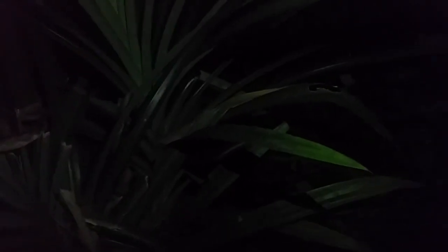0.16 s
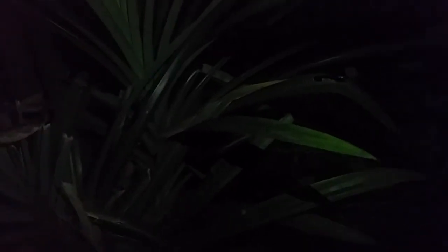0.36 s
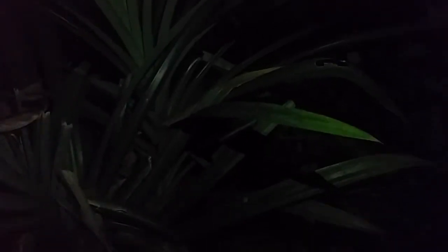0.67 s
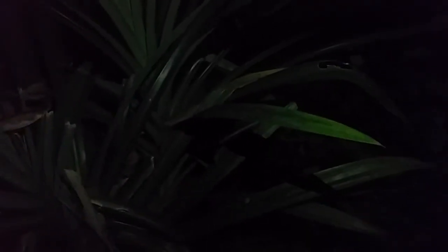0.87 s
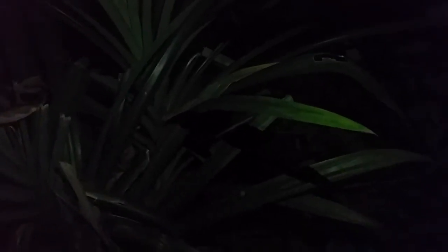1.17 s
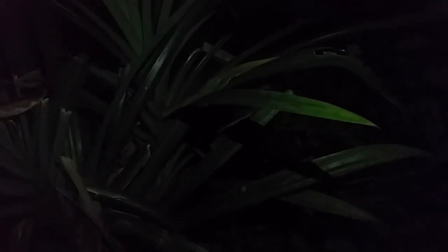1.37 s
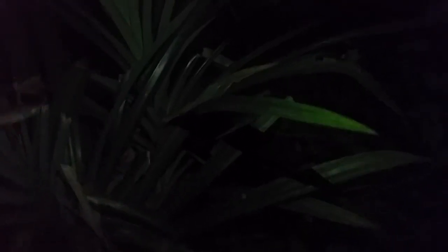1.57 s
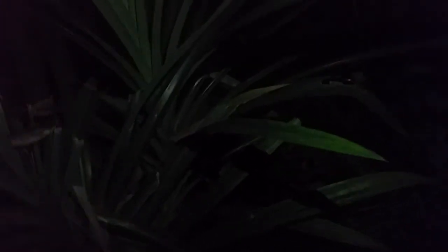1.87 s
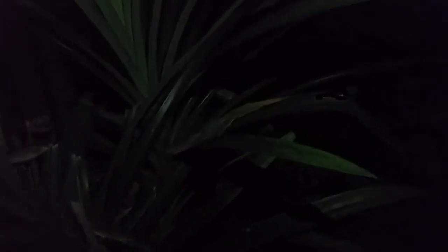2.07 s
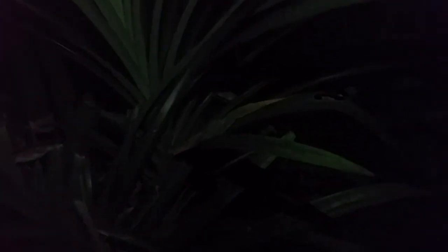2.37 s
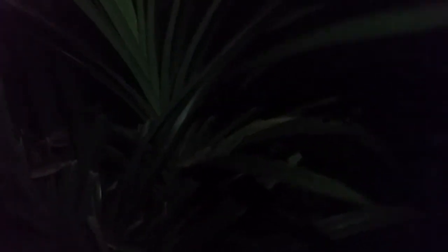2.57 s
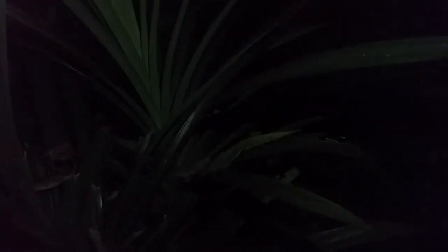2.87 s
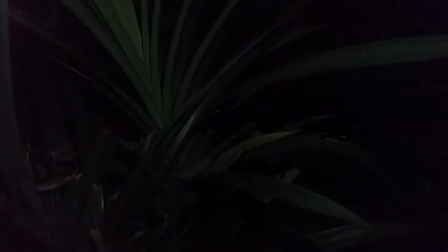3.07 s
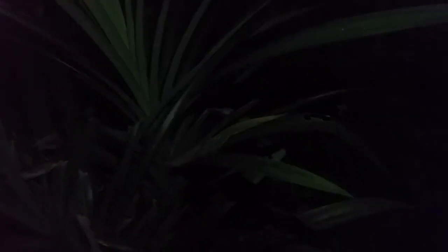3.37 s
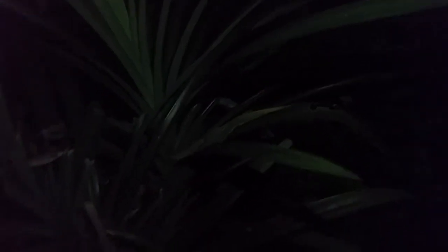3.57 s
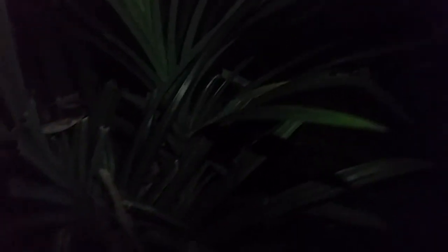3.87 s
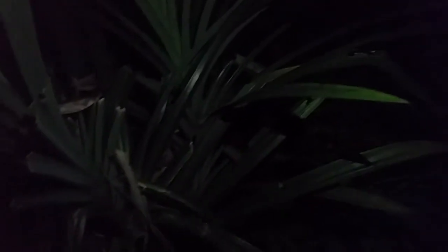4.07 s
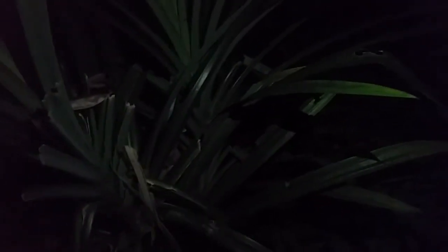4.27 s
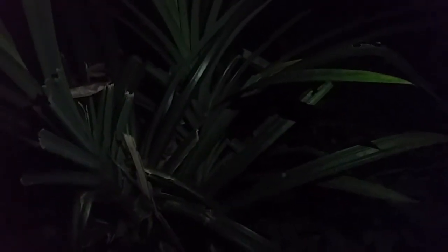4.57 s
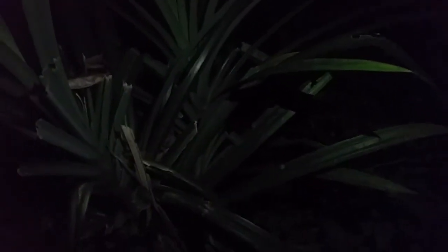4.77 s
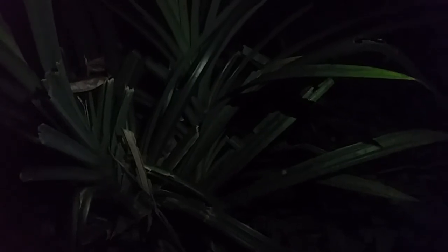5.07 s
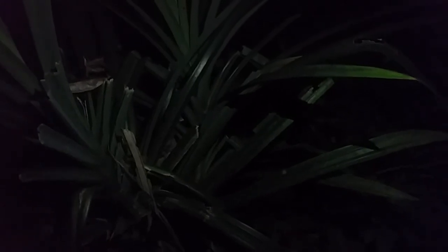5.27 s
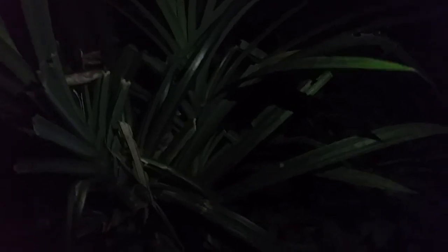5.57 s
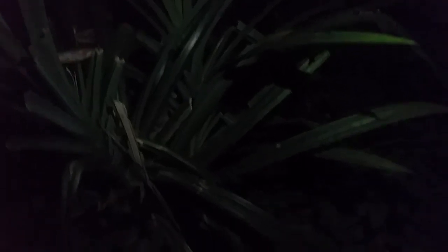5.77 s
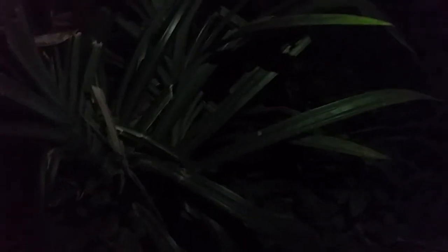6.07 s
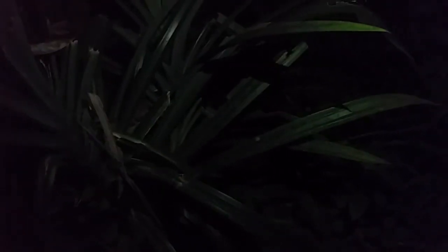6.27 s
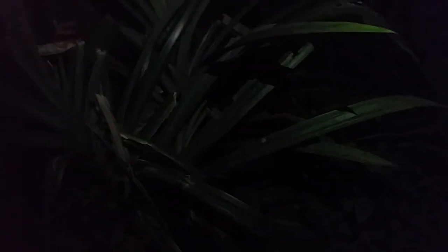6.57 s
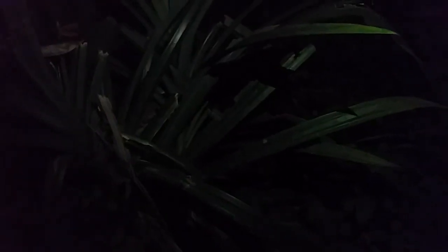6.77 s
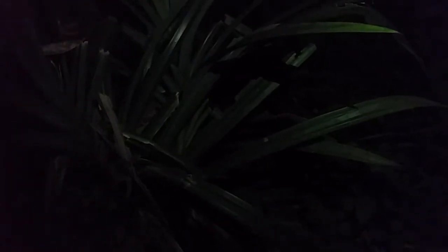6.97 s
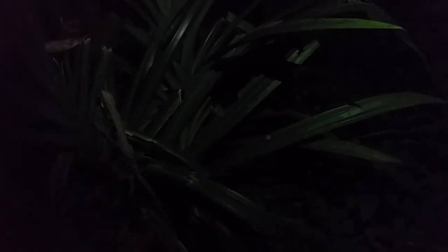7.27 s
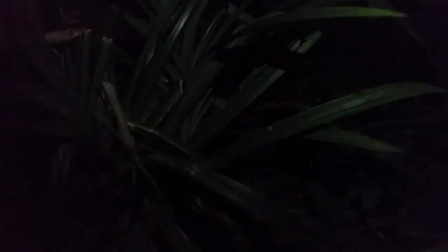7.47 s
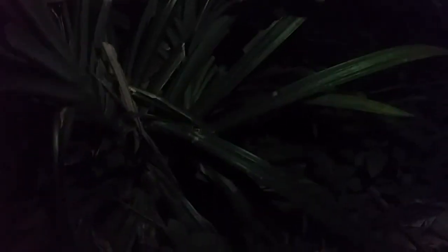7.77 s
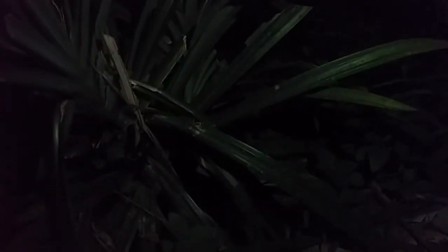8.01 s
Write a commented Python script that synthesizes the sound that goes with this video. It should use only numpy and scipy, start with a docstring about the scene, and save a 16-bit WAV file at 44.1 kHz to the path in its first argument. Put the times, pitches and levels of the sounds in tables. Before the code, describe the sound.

A handheld microphone near a garden plant hears thuds and a small rattle at once, then a katydid's fast buzzing rasp, repeated regularly four times. Two clear-toned crickets sound further off, one trilling, one giving short notes leading to a longer one. Faint insect shimmer, low rumble and an idling distant engine continue throughout, with a few more hand bumps before the middle.

```python
"""Katydid in a night garden

A katydid in a leafy plant rasps a swelling chirp about every two seconds: runs of wing strokes gate a gliding
tone, hiss and buzz. Two smaller crickets, pulsed sine tones, call further off before a chorus of noise bands.
A distant engine throbs as filtered exhaust puffs over a bed of shaped noise, and the hand that holds
the camera bumps it a few times: damped thuds, dull clicks and a short rattle."""
import sys
import numpy as np
from scipy import signal
from scipy.fft import rfft, irfft, next_fast_len
from scipy.io import wavfile
from scipy.ndimage import map_coordinates

SR = 44100
rng = np.random.default_rng(int(sys.argv[2]) if len(sys.argv) > 2 else 0)


def materialize(psi):
    """Save the field psi as 16-bit PCM at rate SR to the path in sys.argv[1].

    A 1-D psi becomes a single channel; in a 2-D psi each row is a channel.
    """
    bounded = np.clip(np.atleast_2d(psi).T, -1, 1)
    quanta = np.round(bounded * 32767).astype(np.int16)
    wavfile.write(sys.argv[1], SR, quanta)


N = 358974

# Levels in the tables are relative: the mix inside each source trims them.
# far-off wash: (time [s], level [dB])
WASH_LEVEL = [(0, -57.5), (.9, -61.5), (2.1, -58.5), (3, -60), (4.2, -57), (4.9, -61.5), (5.7, -58.5),
              (8.14, -61)]
# tone colour of the low rumble: (frequency [Hz], density [dB per Hz])
RUMBLE_SPECTRUM = [(12, -8.5), (25, -4.5), (45, -2.5), (85, 1.5), (130, -5), (200, -13), (300, -29.5),
                   (600, -44), (3000, -120)]
# tone colour of the far-off wash: (frequency [Hz], density [dB per Hz])
WASH_SPECTRUM = [(100, -5.5), (220, 4.5), (350, 0), (700, -4), (1300, -9.5), (1800, -13), (2300, -12),
                 (3500, -20), (5200, -18.5), (5800, -36), (8200, -30.5), (11000, -31.5), (15500, -25)]
# stereo likeness of the night air: (frequency [Hz], left-right correlation [-1 to 1])
STEREO_LIKENESS = [(60, 0.63), (130, 0.75), (290, 0.47), (640, 0.28), (1400, 0.041), (3000, 0)]
# stereo tilt of the night air: (frequency [Hz], left minus right [dB])
STEREO_BALANCE = [(30, -1.5), (70, -3.5), (200, -2), (380, 1), (700, 5.5), (1300, 3.5), (2400, 1),
                  (4400, -4), (15000, 3)]
# engine idling at an almost even speed: (time [s], firing rate [firings per s])
FIRING_RATE = [(0, 27), (2.6, 27.28), (3.6, 26.95), (4.6, 26.86), (5.5, 27.15), (8.14, 27.33)]
# engine loudness: (time [s], boom level [dB], drone level [dB])
ENGINE_LEVELS = [(0, -62.5, -55.5), (1.9, -59.5, -51), (3, -58.5, -51.5), (3.7, -49, -48.5),
                 (4.6, -52.5, -53.5), (5.6, -54, -48), (6.5, -48.5, -53), (7.2, -58, -52.5),
                 (8.14, -55.5, -56)]
# lower hump of the exhaust sound: (frequency [Hz], gain [dB])
BOOM_SPECTRUM = [(15, -29), (27, -30), (54, -6), (82, -14.5), (109, 5), (136, -21), (500, -120)]
# upper hump of the exhaust sound: (frequency [Hz], gain [dB])
DRONE_SPECTRUM = [(10, -50), (54, -5.5), (82, -33), (109, -23.5), (136, 3), (164, -0.5), (191, -14),
                  (220, -26), (270, -27), (330, -24.5), (480, -34.5), (900, -45), (3000, -120)]
# main chorus bands: (time [s], level [dB])
CHORUS_LEVEL = [(0, -70.5), (1.5, -71.5), (3, -72), (4.2, -68.5), (5.2, -81), (6.6, -66), (7.1, -78.5),
                (8.14, -75)]
# other far insects: (centre [Hz], Gaussian width [Hz], level [dB], mean pulse rate [pulses per s])
FAR_INSECTS = [(3120, 206, -77, 39), (4154, 280, -74, 41), (4950, 320, -78.5, 57), (7460, 110, -80, 22),
               (9255, 306, -75, 100)]
# trills of the higher cricket: (start [s], level [dB])
HIGH_TRILLS = [(-.28, -65), (.255, -69), (.85, -71.5), (1.47, -73), (2.47, -70), (3.2, -74), (3.84, -68),
               (5.64, -67), (6.379, -71.5)]
# phrases of the nearer cricket: (start of the long note [s], its level [dB], its pitch [Hz],
# level of the last lead-in note [dB], growth per lead-in note [dB])
CRICKET_PHRASES = [(1.084, -60.5, 6210, -69, 4.5), (2.802, -58, 6250, -62.5, 5.5),
                   (4.533, -59, 6230, -65, 5), (5.877, -59.5, 6290, -64, 0.5), (6.184, -56.5, 6220, -60, 1),
                   (7.45, -55, 6180, -66, 5.5)]
# far answer of the garden: (frequency [Hz], time to fall 60 dB [s])
GARDEN_DECAY = [(2000, 1), (6500, 0.6), (10000, 1), (15000, 0.15)]
# bumps of the hand: (time [s], thud level [dB], thud pitch [Hz], click level [dB], left minus right [dB])
HAND_BUMPS = [(0.062, -22, 90, -37, -25), (.091, -20.5, 119, -36.5, -18), (.104, -32.5, 140, -26.5, -19),
              (.665, -36, 203, -46, -13), (.682, -26, 63, -70, -21), (2.009, -28, 113, -46, -21),
              (2.231, -31.5, 111, -38.5, -22), (2.257, -26, 158, -23.5, -17),
              (3.386, -30.5, 76.7, -81, -21), (4.34, -35, 82, -70, -8)]
# dull click of the camera body: (frequency [Hz], gain [dB])
CLICK_SPECTRUM = [(100, -14), (330, 15), (600, 6.5), (1300, 0), (2200, -8.5), (3000, -23), (4500, -50),
                  (8000, -100)]
# rattle of the camera's case: (frequency [Hz], gain [dB])
CASE_SPECTRUM = [(100, -20), (290, 1.5), (480, -10.5), (800, -17), (3000, -100)]
# the hand settling after a bump: (frequency [Hz], density [dB per Hz])
GRIP_SPECTRUM = [(15, -16), (35, 2), (70, -2), (130, -8), (300, -22), (1000, -64)]
# katydid chirps: (middle of the last wing stroke [s], rasp level [dB], wing tone level [dB],
# tone choked in the last strokes [dB], brightness of the top octave [dB])
KATYDID_CHIRPS = [(1.672, 2.5, 0, -1.5, 3), (3.588, 2, 0, 0, -3), (5.569, 0.5, 0.5, 4, 1.5),
                  (7.482, 1.5, 0, 6.5, -0.5)]
# the scraper catching hard near the end of a chirp: (time [s], level [dB])
SCRAPER_CATCHES = [(1.661, -31), (3.577, -28), (3.593, -23), (5.543, -31), (7.486, -22)]
# noisy part of the wing tone: (frequency [Hz], density [dB per Hz])
WING_TONE_SPECTRUM = [(500, -90), (1400, -38), (1800, -22), (2080, -0.5), (2420, -3), (2600, -4.5),
                      (2800, -16.5), (3600, -19), (5000, -20), (9000, -90)]
# hiss of the teeth: (frequency [Hz], density [dB per Hz])
RASP_SPECTRUM = [(1000, -80), (2500, -45), (3600, -32.5), (4600, -11.5), (5500, -4.5), (6200, -3.5),
                 (7100, 2), (8200, -17.5), (9300, -9), (10300, -16), (13000, -11.5), (15300, -4.5),
                 (16500, -3.5)]
# hiss of the scraper snapping free: (frequency [Hz], density [dB per Hz])
CATCH_SPECTRUM = [(1000, -80), (3000, -38), (4400, -10.5), (5600, -3), (6150, 0.5), (6800, -3),
                  (8000, -12.5), (16000, -24)]

RUMBLE_DB, RUMBLE_DRIFT_DB, WASH_DRIFT_DB = -48, 0.53, 0.43  # mean rumble level; random drift of each layer
TRILL_PULSES = 16
LEAD_COUNT = 4  # short notes before each long one
# note lengths before the fade; spacing of the lead-ins; from the last lead-in to the long note
LEAD_NOTE_S, LONG_NOTE_S, LEAD_GAP_S, LEAD_AHEAD_S = .035, .073, .057, .076
LEAD_HZ, LEAD_STEP_HZ = 6210, 20  # pitch of the last lead-in note; climb per note
GRIP_DB, GRIP_RISE_S, GRIP_T60 = -14, 0.0096, 0.34  # level against the thud table; rise; time to fall 60 dB [s]
STROKE_COUNT, STROKE_SCATTER_DB = 13, .7  # wing strokes per chirp; their random level spread
TONE_DB, TONE_SWELL_DB = -40, 33  # wing tone of the last stroke; its swell, which levels off toward the end
TONE_FOCUS = 1.3  # the wing rings mostly in the middle of each stroke
RASP_DB, RASP_SWELL_DB = -36, 48  # rasp of the last stroke; its steeper swell
TOP_OCTAVE_HZ = 10500  # above this the rasp beams narrowly and changes as the insect turns
BUZZ_DB, BUZZ_STROKE = 0, 6.5  # buzz against the rasp; strongest this many strokes before the end
# stroke width scales; the last few strokes drag on longer
GENTLE_STROKE_S, HARD_STROKE_S, HARD_STROKES = .0037, .012, 4.2
RELEASE_S, RELEASE_SCATTER_S = .008, 0.0011  # snap delay after the middle of a stroke; its spread
RELEASE_DB, RELEASE_STEP_DB = -29, 4.5  # snap of the last stroke; growth per stroke
TOP_HZ = 15850  # upper band limit


def amp(db):
    """Decibels to gain."""
    return 10 ** (np.asarray(db) / 20)


def unit(x):
    """x at rms 1."""
    return x / np.sqrt(np.mean(x ** 2) + 1e-20)


def clock():
    """The time of every sample [s]."""
    return np.arange(N) / SR


def along(points, hz):
    """Read a (frequency, value) curve on a log frequency axis."""
    f, v = np.transpose(points)
    return np.interp(np.log(hz + 1), np.log(f + 1), v)


def curves(rows):
    """One value per sample for each column after the time."""
    s, *columns = np.transpose(rows)
    return [np.interp(clock(), s, column) for column in columns]


def wobble(rate):
    """A smooth random curve with rate knots a second."""
    knots = rng.standard_normal(int(N * rate / SR) + 4)
    return map_coordinates(knots, [clock() * rate], mode="nearest")


def pan(lean_db):
    """Left and right gains for a level difference, left minus right."""
    return unit(amp([[lean_db / 2], [-lean_db / 2]]))


def filtered(x, response):
    """x shaped by a response of frequency."""
    m = next_fast_len(N + SR // 2)
    return irfft(rfft(x, m) * response(np.fft.rfftfreq(m, 1 / SR)), m)[..., :N]


def coloured(x, spectrum):
    """x through a (frequency, dB) spectrum."""
    return filtered(x, lambda hz: amp(along(spectrum, hz)))


def hiss(spectrum):
    """Coloured noise of rms 1, unrelated left and right."""
    return unit(coloured(rng.standard_normal((2, N)), spectrum))


def rush(spectrum):
    """Stereo noise of rms 1, alike in the bass and unrelated in the treble."""
    def mid_side(hz):
        # mid and side powers that give the wanted left-right correlation
        turn = np.arccos(np.clip(along(STEREO_LIKENESS, hz), -1, 1)) / 2
        return amp(along(spectrum, hz)) * [np.cos(turn), np.sin(turn)]

    def tilt(hz):
        return amp(np.outer([.5, -.5], along(STEREO_BALANCE, hz)))

    mid, side = filtered(rng.standard_normal((2, N)), mid_side)
    return unit(filtered(np.array([mid + side, mid - side]), tilt))


def band(centre_hz, width_hz):
    """Narrow noise of rms 1, unrelated left and right."""
    noise = rng.standard_normal((2, N))
    return unit(filtered(noise, lambda hz: np.exp(-((hz - centre_hz) / width_hz) ** 2 / 2)))


def ringing(hz, spread_hz, rate):
    """A tone of rms 1 whose pitch wavers quickly."""
    return np.sqrt(2) * np.sin(2 * np.pi * np.cumsum(hz + spread_hz * wobble(rate)) / SR)


def add(track, s, sound):
    """Mix a short sound into a track from time s."""
    i = int(np.clip(round(s * SR), 0, N - 1))
    track[..., i:i + sound.shape[-1]] += sound[..., :N - i]


def garden(x, leaves_db, leaves_t60, far_db):
    """Quick scatter from the leaves, then a long faint answer from trees and walls."""
    # the far answer fades at its own speed in each frequency band
    hz, t, z = signal.stft(rng.standard_normal((2, SR * 3 // 4)), SR, nperseg=256)
    fade = amp(-60 * t / along(GARDEN_DECAY, hz)[:, None])
    far = signal.istft(z * fade, SR, nperseg=256)[1]
    t = np.arange(far.shape[1]) / SR
    leaves = rng.standard_normal(far.shape) * amp(-60 * t / leaves_t60)
    answer = amp(leaves_db) * leaves / np.linalg.norm(leaves[0])
    answer = answer + amp(far_db) * far / np.linalg.norm(far[0])
    return x + signal.fftconvolve(np.broadcast_to(x, (2, N)), answer, axes=1)[:, :N]


def night_air():
    """Low rumble and the soft wash of far-off surroundings: shaped noise, each drifting a little."""
    wash_db, = curves(WASH_LEVEL)
    rumble = amp(RUMBLE_DB + RUMBLE_DRIFT_DB * wobble(3.064)) * rush(RUMBLE_SPECTRUM)
    wash = amp(wash_db + WASH_DRIFT_DB * wobble(3.86)) * rush(WASH_SPECTRUM)
    return rumble + wash


def engine(scatter_db=0.3, pipe_delay=.0025):
    """One exhaust puff per firing, slightly uneven in level, dulled by distance to a low throb."""
    rate, = curves(FIRING_RATE)
    boom_db, drone_db = curves(ENGINE_LEVELS)
    firings = np.flatnonzero(np.diff(np.round(np.cumsum(rate) / SR)))
    puffs = np.zeros(N)
    puffs[firings] = amp(scatter_db * rng.standard_normal(len(firings)))

    def pipe(spectrum):
        # a quarter-cycle phase turn and a short delay
        def response(hz):
            return -1j * amp(along(spectrum, hz)) * np.exp(-2j * np.pi * hz * pipe_delay)
        return unit(filtered(puffs, response))

    boom = amp(boom_db + 1) * pipe(BOOM_SPECTRUM)
    drone = amp(drone_db + 1.0) * pipe(DRONE_SPECTRUM)
    return (boom + drone) * pan(lean_db=0.0)


def chorus():
    """Many far insects blur into pulsing noise bands, the strongest around 7 kHz."""
    def pulsing(rate, depth):
        uneven_rate = rate * (1 + 0.0617 * wobble(6))
        return unit(1 + depth * np.sin(2 * np.pi * np.cumsum(uneven_rate) / SR))

    level_db, = curves(CHORUS_LEVEL)
    upper = band(centre_hz=7130, width_hz=100) * pulsing(rate=36, depth=.55)
    lower = band(centre_hz=6850, width_hz=75) * pulsing(rate=33, depth=.6)
    others = np.zeros((2, N))
    for hz, width_hz, db, rate in FAR_INSECTS:
        others += amp(db + .8 * wobble(2)) * band(hz, width_hz) * pulsing(rate, depth=.15)
    main = amp(level_db) * (amp(-4.0) * upper + amp(-5.0) * lower)
    return main * pan(lean_db=3.0) + amp(-2) * others * pan(lean_db=14.5)


def high_cricket(pitch_hz=6835, pulse_rate=52, sweep_hz=70):
    """Trills of sixteen pure pulses that grow by 3 dB, each pulse sliding a little down."""
    song = np.zeros(N)
    duration = TRILL_PULSES / pulse_rate
    t = np.arange(int(duration * SR)) / SR
    cycle = t * pulse_rate % 1
    pulses = np.sin(np.pi * cycle) ** 4 * amp(-3 * (1 - t / duration))
    glide_hz = pitch_hz - sweep_hz * (cycle - .5)
    shape = unit(pulses * np.sin(2 * np.pi * np.cumsum(glide_hz) / SR))
    for start, db in HIGH_TRILLS:
        trill = amp(db + 0.5) * shape
        add(song, start, trill[start + t >= 0])  # a trill already under way enters partway
    return garden(song, leaves_db=-14, leaves_t60=.04, far_db=-14) * pan(lean_db=1.5)


def phrase_notes():
    """Every note of the nearer cricket as (start [s], length [s], level [dB], pitch [Hz])."""
    for s, db, hz, lead_db, step_db in CRICKET_PHRASES:
        for to_go in range(LEAD_COUNT):
            start = s - LEAD_AHEAD_S - to_go * LEAD_GAP_S
            yield start, LEAD_NOTE_S, lead_db - step_db * to_go, LEAD_HZ - LEAD_STEP_HZ * to_go
        yield s, LONG_NOTE_S, db, hz


def near_cricket(edge=0.0044, overtone_db=-21, rise_hz=50, waver_hz=55):
    """Four short notes lead up to a longer one; each rises and its tone wavers tooth by tooth."""
    song = np.zeros(N)
    t = np.arange(SR // 6) / SR
    shimmer = 1 + .5 * np.sin(2 * np.pi * 75 * t)
    for s, length, db, hz in phrase_notes():
        waver = np.interp(t, np.linspace(0, t[-1], num=64), rng.standard_normal(size=64))
        shape = np.clip(t / edge, 0, 1) * np.clip((length - t) / edge + 1, 0, 1)
        rise = rise_hz * (np.minimum(t / length, 1) - .5)
        phase = 2 * np.pi * np.cumsum(hz + waver_hz * waver + rise) / SR
        tone = np.sin(phase) + amp(overtone_db) * np.sin(2 * phase)
        add(song, s, amp(db) * shape * shimmer * tone)
    return garden(song, leaves_db=-2, leaves_t60=.25, far_db=-6) * pan(lean_db=2.5)


def bumps(thud_t60=0.03, shell_db=-11, shell_t60=0.051):
    """The camera body gives a heavily damped thud, a dull click and a case rattle; then the grip settles."""
    thuds, clicks, rattle, grip = np.zeros((4, 2, N))
    t = np.arange(SR // 3) / SR
    for s, thud_db, hz, click_db, lean_db in HAND_BUMPS:
        side = pan(lean_db)
        thud = amp(thud_db + 5.5 - 60 * t / thud_t60) * np.sin(2 * np.pi * hz * t)
        add(thuds, s, -side * thud * (1 - np.exp(-t / 0.00091)))
        add(clicks, s, side * amp(click_db + 20))  # a single-sample impulse
        rattle_db = (thud_db + click_db) / 2 + shell_db
        add(rattle, s, side * amp(rattle_db - 60 * t / shell_t60) * (1 - np.exp(-t / 0.00038)) ** 2)
        grip_fade = amp(thud_db + GRIP_DB - 60 * t / GRIP_T60)
        add(grip, s, side * grip_fade * (1 - np.exp(-t / GRIP_RISE_S)))
    case = rattle * unit(coloured(rng.standard_normal(N), CASE_SPECTRUM))
    settling = grip * unit(coloured(rng.standard_normal(N), GRIP_SPECTRUM))
    return thuds - coloured(clicks, CLICK_SPECTRUM) + case + settling


def wing_strokes(stroke_gap=.01755, wing_hz=2380, glide_hz=170, catch_decay=0.0018, buzz_loss_db=1.1):
    """Each stroke drags the scraper over the file: the wing tone, then envelopes of rasp, top, buzz and catch."""
    tone, rasp, top, buzz, catch = np.zeros((5, N))
    t = np.arange(SR // 25) / SR
    middle = t[-1] / 2
    jolt = (1 - np.exp(-t / 0.00037)) * np.exp(-t / catch_decay)
    for s, db in SCRAPER_CATCHES:
        add(catch, s, amp(db) * jolt)
    for last, chirp_db, wing_db, choke_db, bright_db in KATYDID_CHIRPS:
        for k in range(STROKE_COUNT):
            to_go = STROKE_COUNT - 1 - k
            left = to_go / STROKE_COUNT
            choked_db = choke_db * max(0, 1 - to_go / 2)
            tone_db = TONE_DB + wing_db - TONE_SWELL_DB * left ** 2 - choked_db
            rasp_db = RASP_DB + chirp_db - RASP_SWELL_DB * left ** 1.3
            drag = np.exp(-(to_go / HARD_STROKES) ** 2)
            width = GENTLE_STROKE_S + (HARD_STROKE_S - GENTLE_STROKE_S) * drag
            u = (t - middle) / width
            stroke = amp(rng.normal(0, STROKE_SCATTER_DB)) * np.exp(-(2.07 * u) ** 2)
            start = last - to_go * stroke_gap - middle
            # the wing's pitch slides up as the stroke speeds up
            slide_hz = wing_hz + rng.normal(0, 55) + glide_hz * np.tanh(3 * u)
            ring = np.sin(2 * np.pi * (np.cumsum(slide_hz) / SR + rng.random()))
            add(tone, start - .001, amp(tone_db) * stroke * np.exp(-(TONE_FOCUS * u) ** 2) * ring)
            add(rasp, start, amp(rasp_db) * stroke)
            add(top, start, amp(rasp_db + bright_db) * stroke)
            # the even buzz stands out most mid-chirp; the hard last strokes break up into broad hiss
            buzz_db = rasp_db + BUZZ_DB - buzz_loss_db * abs(to_go - BUZZ_STROKE)
            add(buzz, start, amp(buzz_db) * stroke)
            # the scraper snaps free just after each stroke
            release = start + middle + RELEASE_S + rng.normal(0, RELEASE_SCATTER_S)
            add(catch, release, amp(chirp_db + RELEASE_DB - RELEASE_STEP_DB * to_go) * jolt)
    return tone, rasp, top, buzz, catch


def katydid():
    """The wing rings near 2.4 kHz while teeth and scraper excite hiss and wavering tones near 6 kHz."""
    tone, rasp, top, buzz, catch = wing_strokes()

    def resonance(hz, spread_hz):
        # the treble reaches each ear by other paths through the leaves
        return np.array([ringing(hz, spread_hz, rate=560) for ear in range(2)])

    tone_envelope = np.abs(signal.hilbert(tone))
    wing = amp(-1.5) * tone + amp(-2.5) * tone_envelope * hiss(WING_TONE_SPECTRUM)
    scrape = hiss(RASP_SPECTRUM)
    scrape_top = filtered(scrape, lambda hz: 1 - 1 / (1 + (hz / TOP_OCTAVE_HZ) ** 10))
    teeth = rasp * (scrape - scrape_top) + top * scrape_top
    teeth = teeth + buzz * resonance(hz=6420, spread_hz=300)
    snap = unit(resonance(hz=6010, spread_hz=240) + 1.3 * hiss(CATCH_SPECTRUM))
    treble = amp(-0.9) * teeth * pan(lean_db=2.0) + amp(-1.5) * catch * snap
    wing = garden(wing, leaves_db=-7, leaves_t60=.1, far_db=-13.5)
    treble = garden(treble, leaves_db=-8, leaves_t60=.1, far_db=-12)
    return wing * pan(lean_db=-2) + treble


def scene():
    """Insects over the throb and the night air, with the bumps of the hand."""
    background = night_air() + engine() + chorus()
    return background + high_cricket() + near_cricket() + bumps() + katydid()


def record(dry):
    """Keep nothing above the upper band limit."""
    return filtered(dry, lambda hz: hz < TOP_HZ)


dry = scene()
out = record(dry)
materialize(out)
```